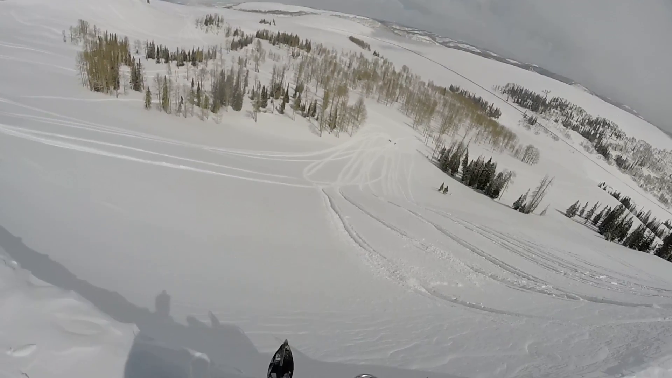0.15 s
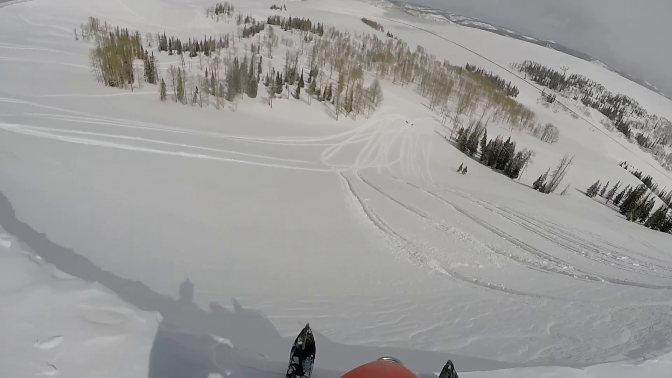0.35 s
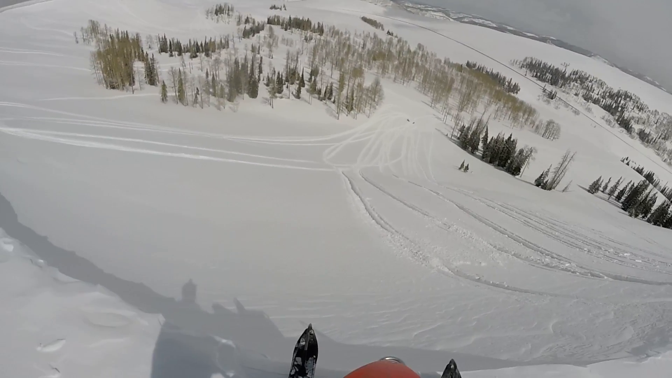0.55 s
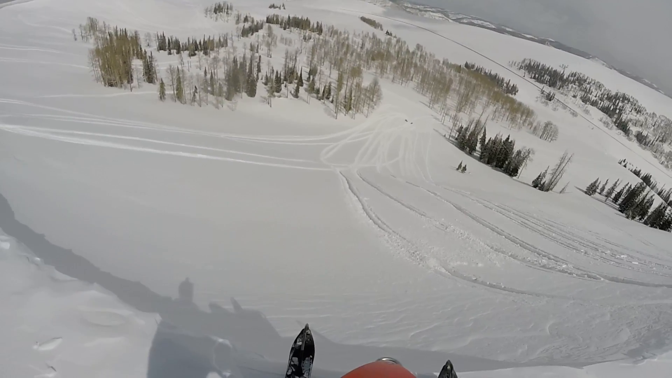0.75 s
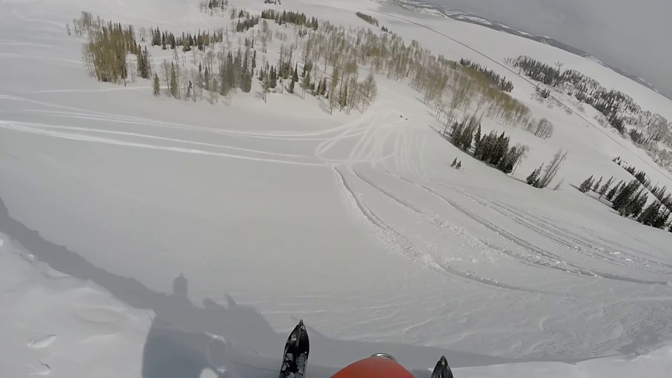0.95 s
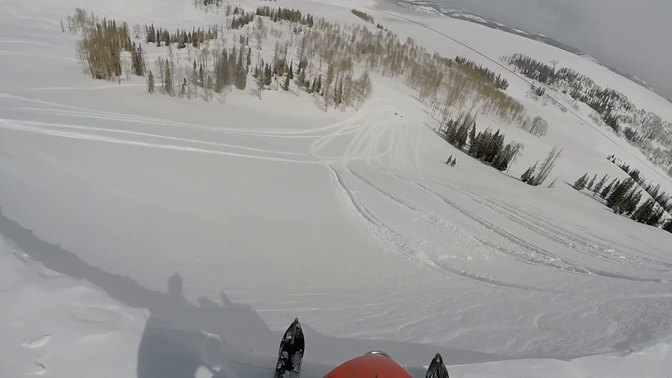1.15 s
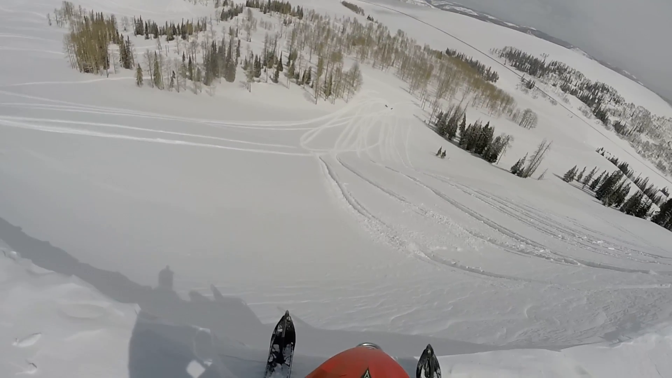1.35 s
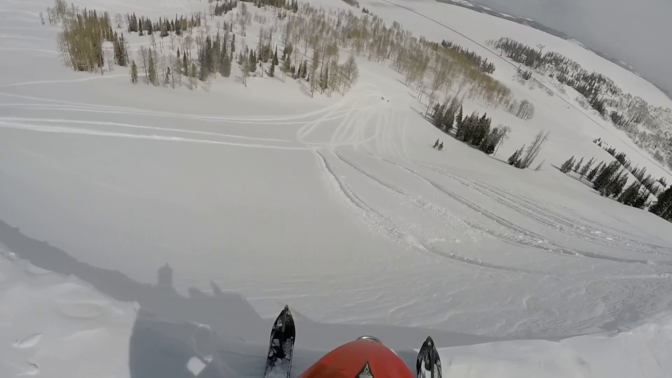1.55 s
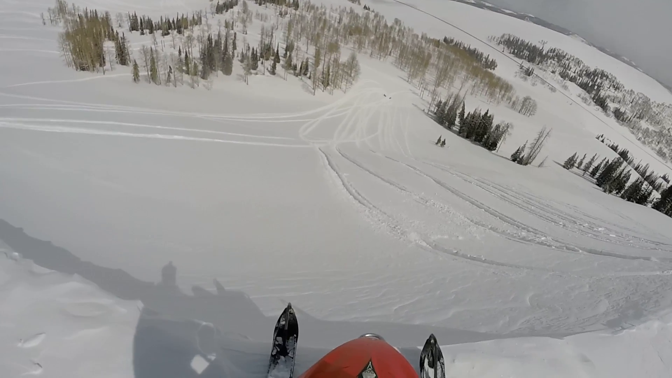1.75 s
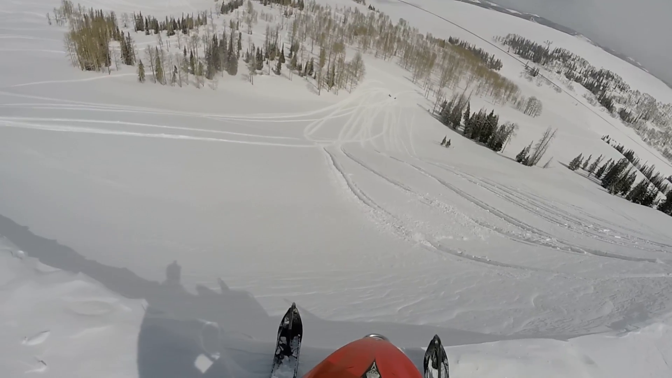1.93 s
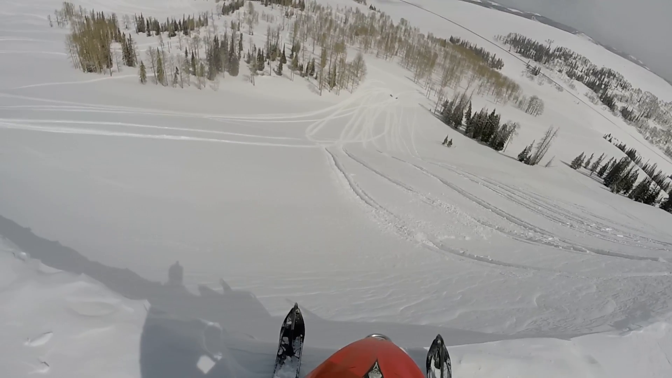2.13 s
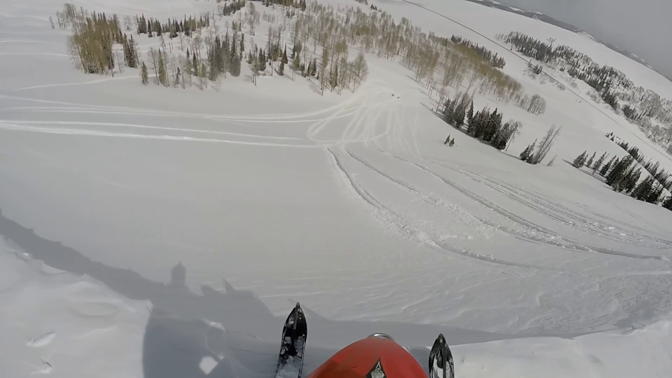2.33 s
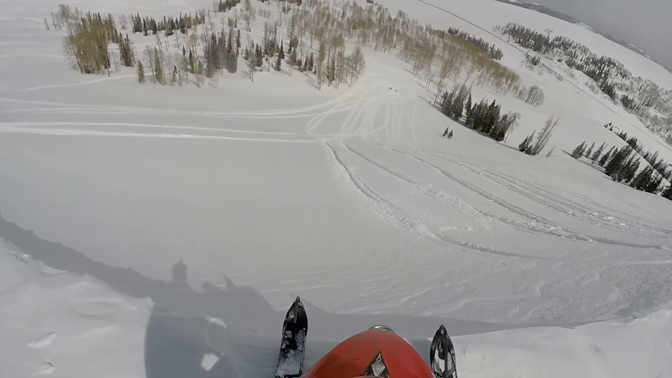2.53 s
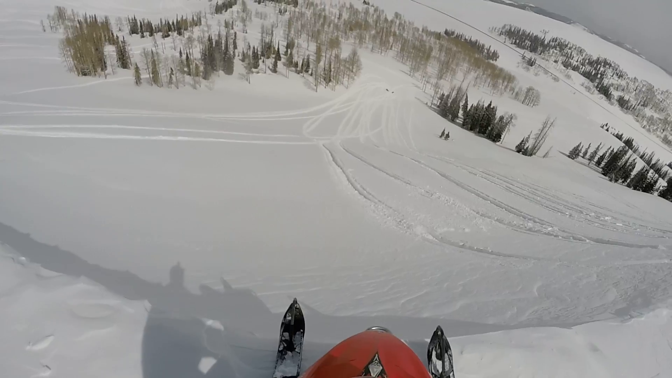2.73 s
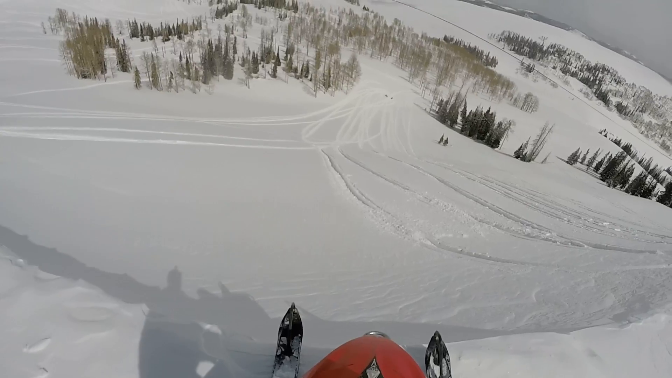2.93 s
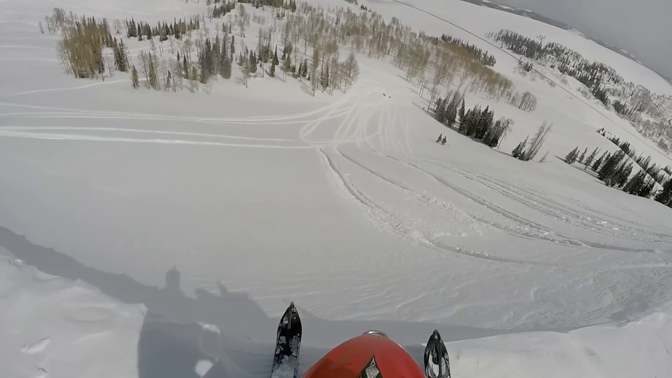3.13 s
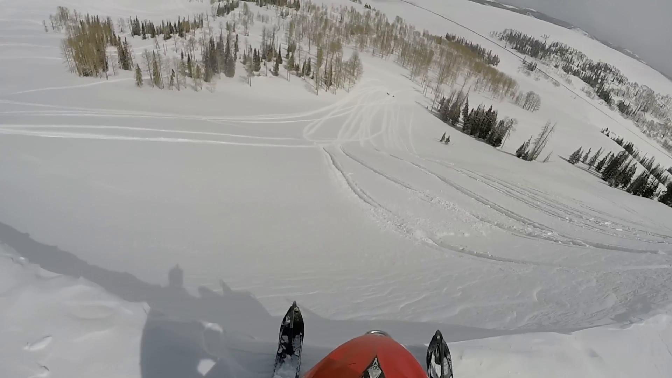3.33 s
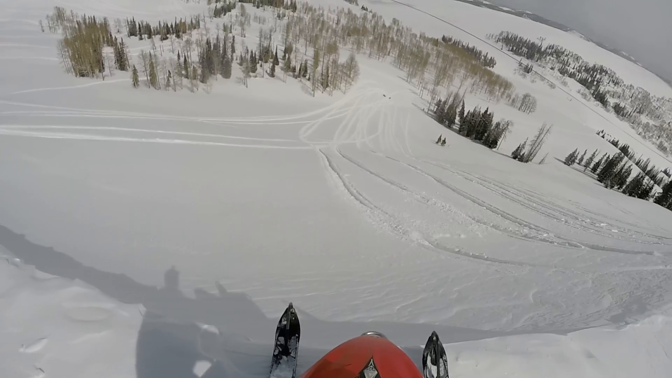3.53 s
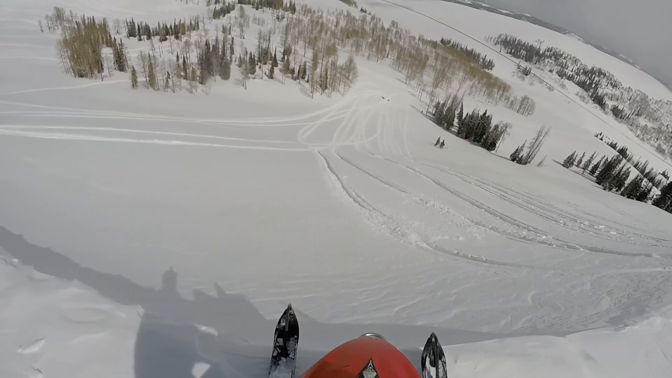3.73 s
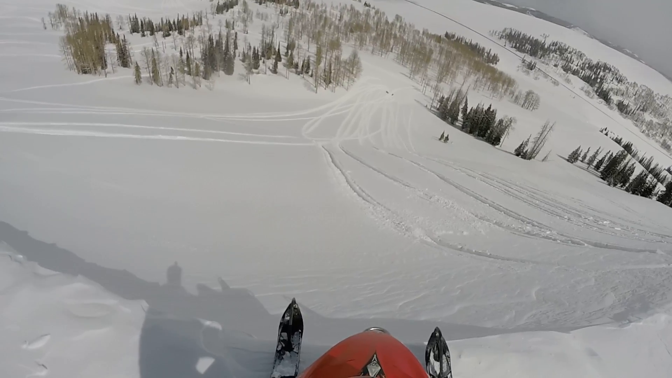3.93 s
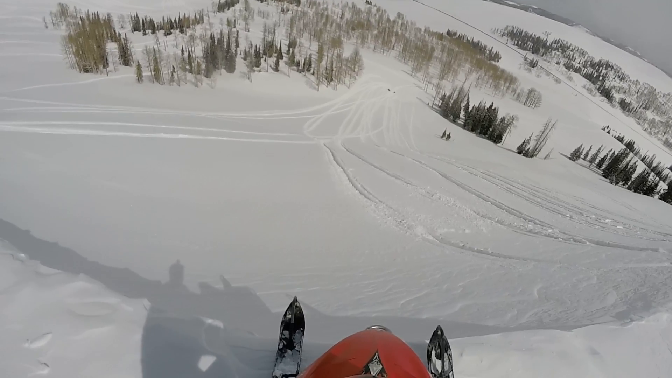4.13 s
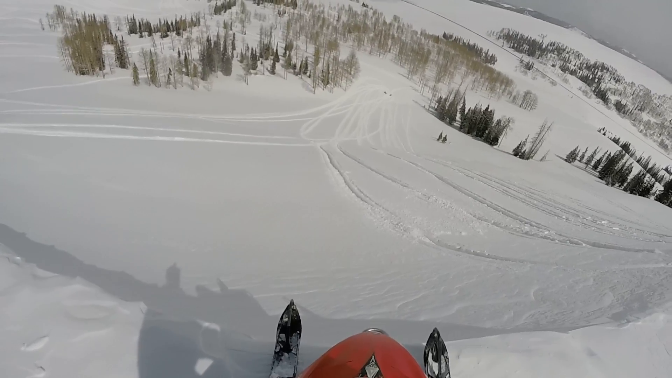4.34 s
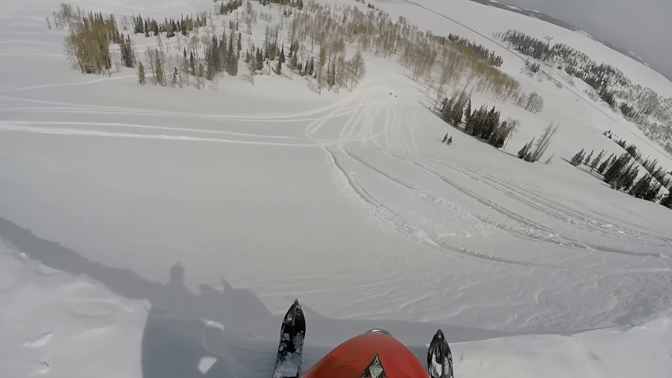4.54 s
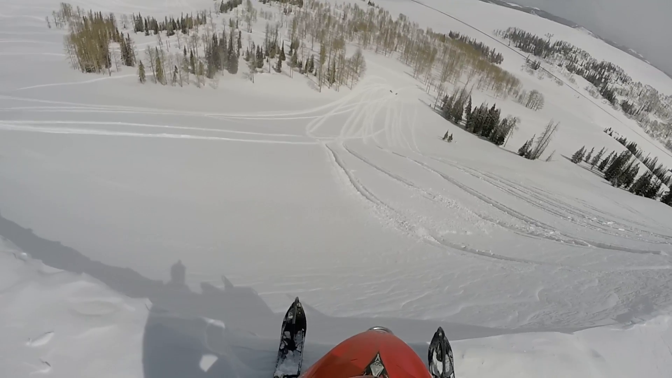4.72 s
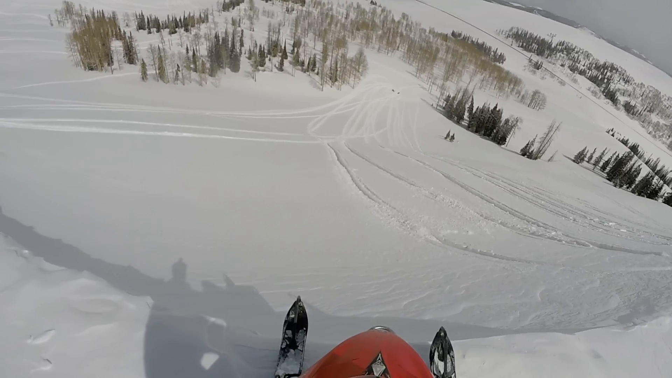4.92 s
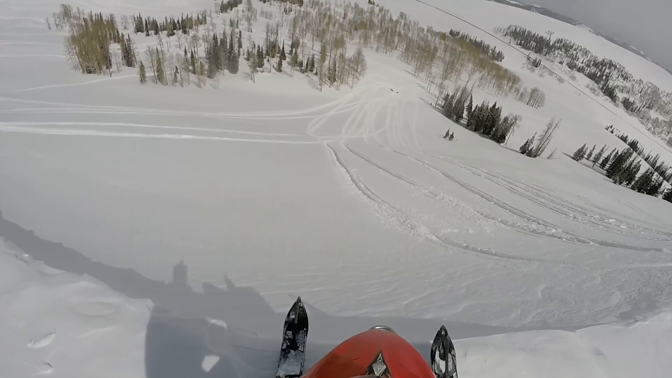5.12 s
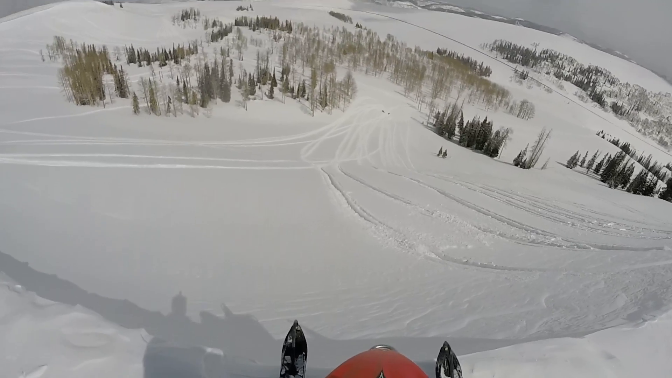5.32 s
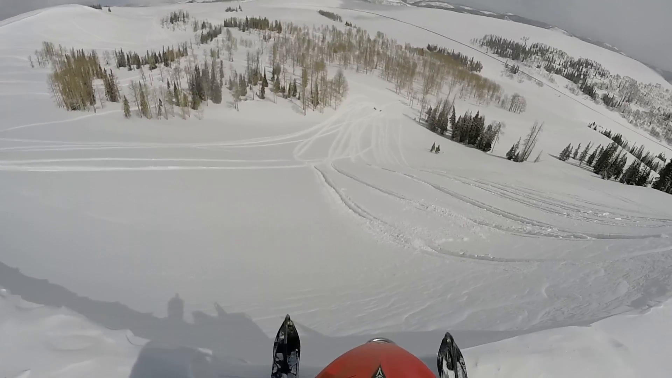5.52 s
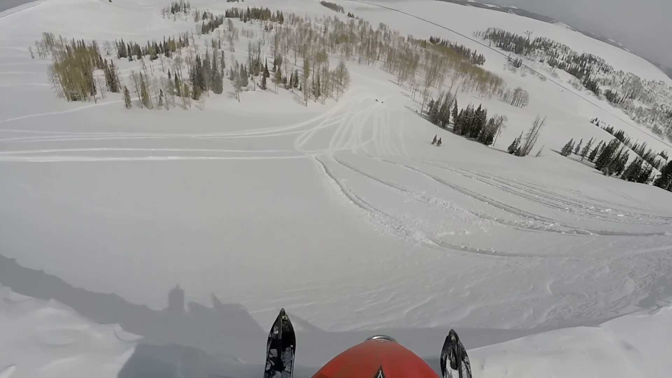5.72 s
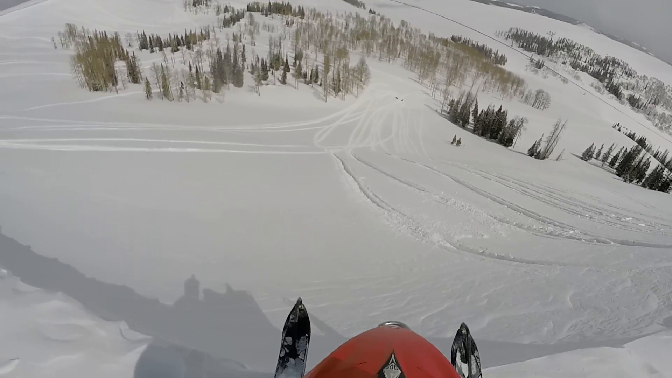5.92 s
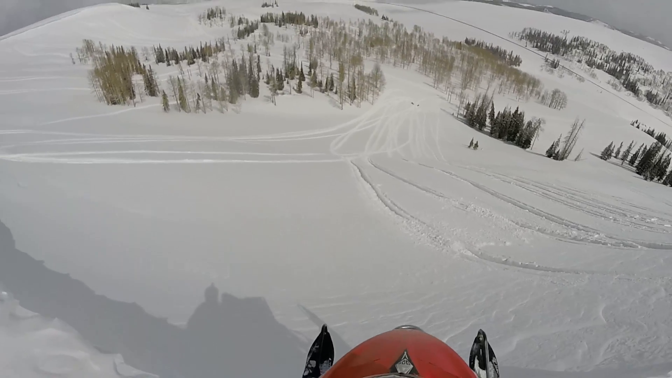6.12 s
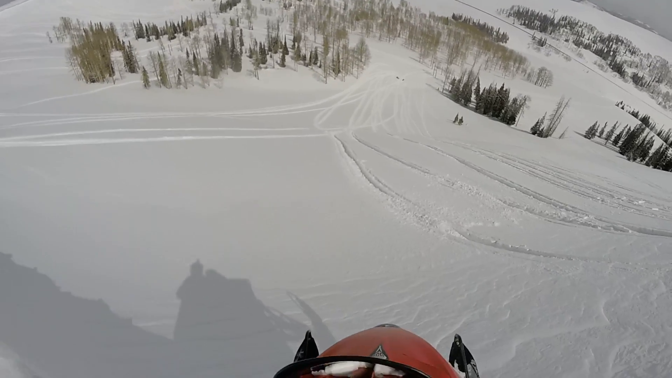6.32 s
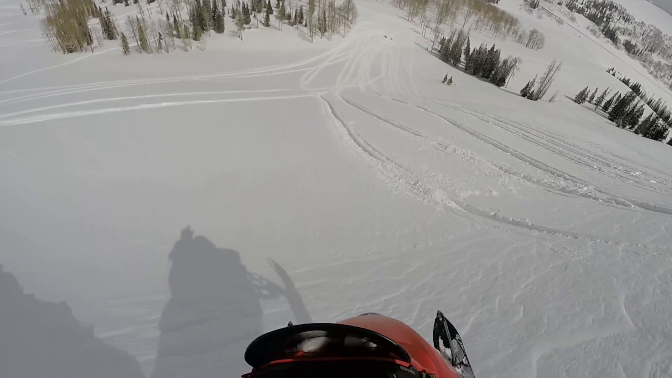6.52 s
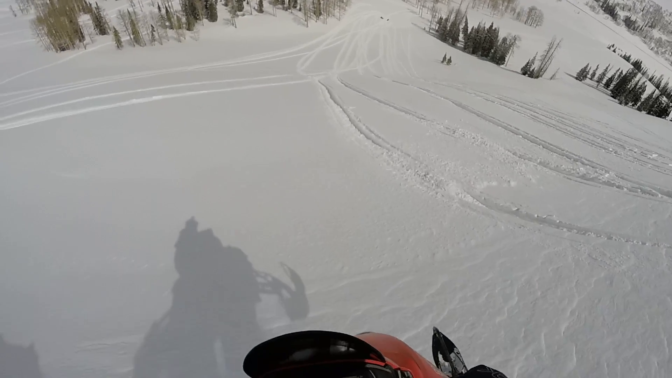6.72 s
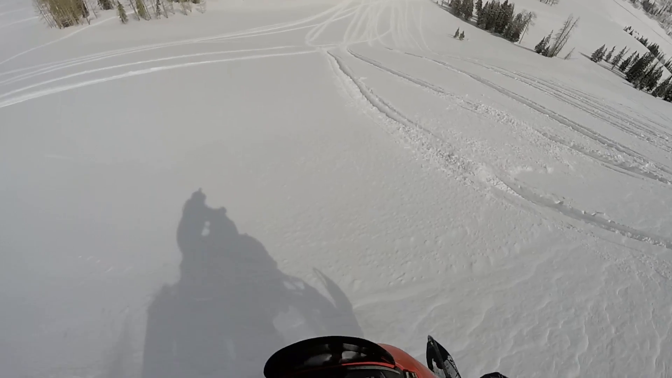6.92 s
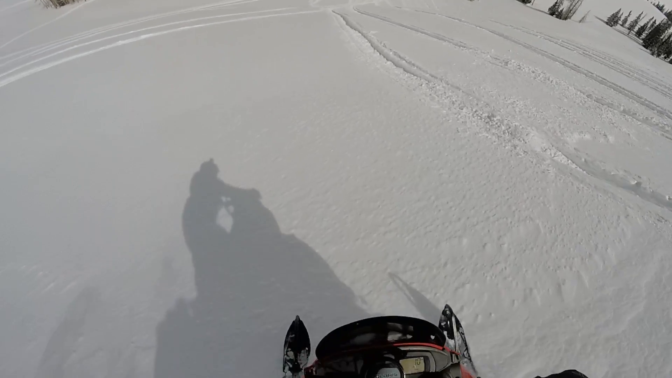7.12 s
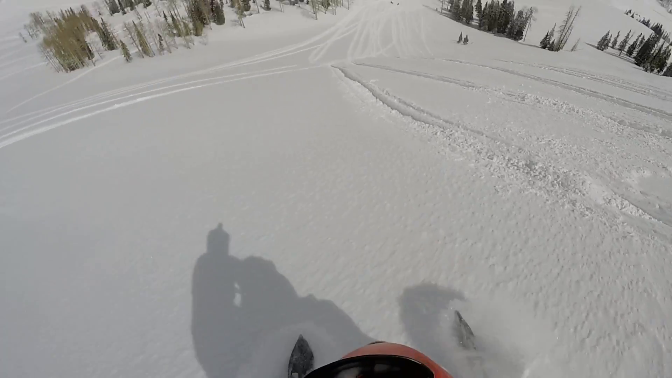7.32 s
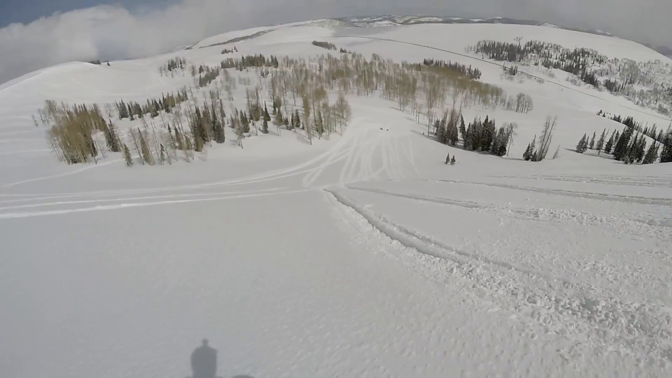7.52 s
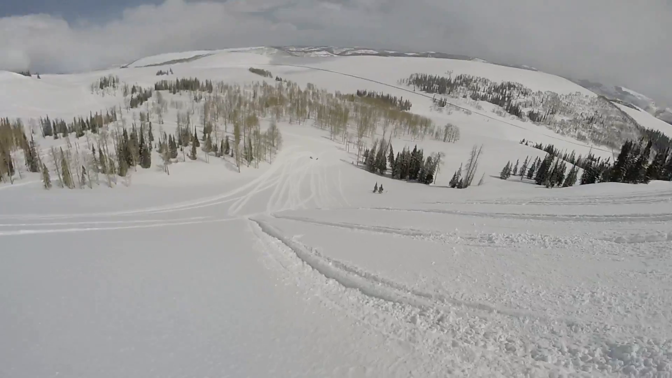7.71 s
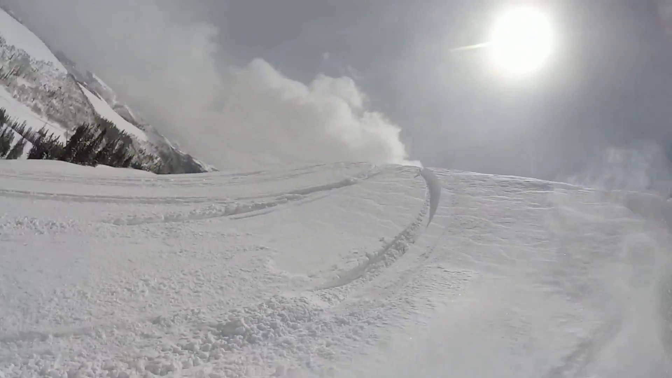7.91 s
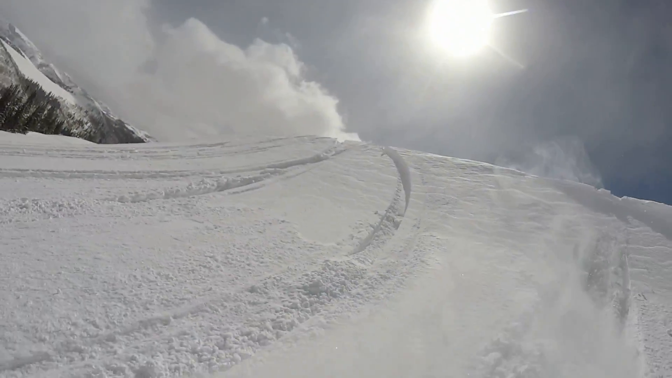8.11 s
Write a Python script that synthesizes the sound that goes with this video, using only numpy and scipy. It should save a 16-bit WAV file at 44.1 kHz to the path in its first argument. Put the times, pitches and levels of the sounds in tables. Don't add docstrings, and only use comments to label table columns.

```python
import sys
import numpy as np
from scipy import signal
from scipy.fft import rfft, irfft, next_fast_len
from scipy.io import wavfile
from scipy.ndimage import uniform_filter1d, map_coordinates

SR = 44100
rng = np.random.default_rng(int(sys.argv[2]) if len(sys.argv) > 2 else 0)


def voltage_ratio(level):
    return 10 ** (np.asarray(level, float) / 20)


def int16_out(signal):
    q = np.round(np.clip(np.atleast_2d(signal).T, -1, 1) * 32767)
    wavfile.write(sys.argv[1], SR, q.astype(np.int16))


N = 364266
STEP = 32


def unit(x):
    return x / np.sqrt(np.mean(x ** 2) + 1e-20)


def curves(rows):
    s, *cols = np.transpose(rows)
    return [np.interp(np.arange(N) / SR, s, c) for c in cols]


def full(control):
    return np.interp(np.arange(N), np.arange(0, N, STEP), control)


def drift(rate_hz):
    knots = rng.standard_normal(int(N * rate_hz / SR) + 4)
    return map_coordinates(knots, [np.arange(0, N, STEP) * rate_hz / SR])


def wobble(rate_hz):
    return full(drift(rate_hz))


def fade(start_s, stop_s):
    return np.clip((np.arange(N) / SR - start_s) / (stop_s - start_s), 0, 1)


def swells(s, db, hold_s, rise, fall):
    t = np.arange(0, N, STEP) / SR - np.reshape(s, (-1, 1))
    db, hold_s, rise, fall = (np.reshape(v, (-1, 1)) for v in (db, hold_s, rise, fall))
    level_db = db + rise * np.minimum(t, 0) - fall * np.maximum(t - hold_s, 0)
    return full(10 * np.log10(np.sum(voltage_ratio(2 * level_db), 0) + 1e-12))


def place(out, s, t, x):
    first = round((s + t[0]) * SR)
    out[first:first + len(t)] += x


def filtered(x, response):
    m = next_fast_len(len(x) + len(x) // 16)
    return irfft(rfft(x, m) * response(np.fft.rfftfreq(m, 1 / SR)), m)[:len(x)]


def along(points, hz):
    f, db = np.transpose(points)
    return np.interp(np.log(hz), np.log(f), db)


def colour(points):
    hz, db = np.transpose(points)
    return lambda f: voltage_ratio(np.interp(np.log(f + 1), np.log(hz + 1), db, left=-120, right=-120))


def peaks(modes):
    def response(f):
        return sum((-1) ** k * voltage_ratio(db) * 1j * f * w / (c * c - f * f + 1j * f * w + 1e-9)
                   for k, (c, w, db) in enumerate(modes))
    return response


def lift(modes, f):
    return sum(db / (1 + (2 * (f - c) / w) ** 2) for c, w, db in modes)


# centre in Hz, width in Hz, lift in dB.
CAVITY_MODES = [(684, 21, 4), (1235, 120, 6.5), (1620, 420, 7.5), (2358, 81, 7.5), (2950, 330, 4.5),
                (4647, 80, 6), (5400, 130, -3.5), (6060, 200, 4.5), (7600, 500, 4), (9000, 250, 3),
                (10200, 350, 3.5), (11800, 600, 4.5)]


def housing(f):
    return voltage_ratio(lift(CAVITY_MODES, f))


# mixture catches in s, firing rate there in Hz, mixture quits in s, rate there in Hz.
IDLE_SURGES = [(-.4, 45, -.15, 80), (.335, 42, .565, 84), (1.03, 44.5, 1.28, 71), (1.65, 44, 1.86, 58),
               (1.93, 52, 1.99, 56), (2.145, 42.5, 2.35, 85.5), (2.85, 49, 3.04, 79), (3.42, 50, 3.6, 89.5),
               (4.2, 48, 4.395, 71.5), (4.665, 48, 4.81, 76)]
# time in s, firing rate in Hz, load in dB, roar in dB.
THROTTLE_PULLS = [
    [(5.31, 38.05, 2.5, -51), (5.39, 50.92, -4, -49), (5.49, 79.9, 2, -47), (5.7, 139.7, 0, -38),
     (5.79, 156.3, 0.5, -35), (5.93, 170, 1.5, -36), (6.02, 152.8, -1.5, -37)],
    [(6.16, 138.9, -6, -38), (6.27, 149.9, 0.5, -34.5), (6.4, 165.9, -1.5, -34), (6.48, 166.9, -3, -33.5),
     (6.72, 160.4, -13, -34), (6.8, 147.6, -23, -38.5)],
]


def speed():
    pulls = np.concatenate(THROTTLE_PULLS)
    first_s, first_hz = pulls[0, :2]
    idle = [(s, hz, 0, -120) for s, hz in np.reshape(IDLE_SURGES, (-1, 2))]
    rate, load_db, roar_db = curves([*idle, (first_s - .03, first_hz, 0, -75), *pulls])
    burning = (np.gradient(rate) > 0) | (np.arange(N) > first_s * SR)
    rate = uniform_filter1d(rate, round(.035 * SR))
    burning = uniform_filter1d(1. * burning, round(.045 * SR))
    return rate, burning, load_db, roar_db


# from s, to s.
SPARK_CUT_S = (5.955, 6.128)


def ignition():
    off_s, on_s = SPARK_CUT_S
    return 1 - 0.86 * (fade(off_s, off_s + 0.01) - fade(on_s, on_s + 0.0156))


# start in s, level in dB, hold in s, fade in dB per s.
FIRING_BURSTS = [(0, -59, .01, 97.5), (0.305, -56, 0.0133, 600), (0.37, -52.5, .02, 60),
                 (0.43, -50.5, 0.05, 30), (0.833, -59.5, .005, 600), (1.023, -53, .03, 95.5),
                 (1.13, -49, .01, 47), (1.617, -50, .005, 250), (1.685, -51.5, .01, 80),
                 (1.774, -48, 0.0286, 250), (1.95, -58.5, .01, 50), (2.148, -49, 0.15, 21),
                 (2.85, -55, .02, 60), (2.916, -49.5, .05, 48), (3.416, -49, 0.21, 35),
                 (4.176, -52, 0.017, 197), (4.269, -49, 0.0098, 59.5), (4.677, -48.5, .01, 250),
                 (4.721, -53, 0.1, 38.5)]


def mechanical_level(roar_db):
    start_s, db, hold_s, fall = np.transpose(FIRING_BURSTS)
    burst_db = swells(start_s, db, hold_s, 530, fall)
    return 10 * np.log10(voltage_ratio(burst_db) ** 2 + voltage_ratio(roar_db) ** 2 + voltage_ratio(-55.8) ** 2)


# frequency of the order in Hz, level in dB.
CRANK_ORDER = [(20, -47), (33, -43.5), (43, -42), (55, -61.5), (85, -51.5)]
BURNING_ORDER = [(45, -45), (65, -41), (81, -36.5), (110, -33.5), (140, -27.5), (153, -23), (169, -34)]
COASTING_ORDER = [(45, -50), (56, -52), (71, -41), (85, -43), (170, -30)]
TWICE_ORDER = [(80, -43), (101, -35.5), (140, -44.5), (165, -50.5), (220, -45.5), (285, -31.5), (312, -35),
               (336, -31)]
# multiple of firing rate, level in dB, dB per dB of load.
UPPER_ORDERS = [(1.5, -12, 0), (3, -2.5, .8), (4, -4.5, -.2), (5, -4.5, .4), (6, -6.5, .4), (7, -3, 0),
                (8, -7, 0), (9, -11, -.2), (10, -12, 0), (11, -9, 0), (14, -9, 0), (15, -11, 0),
                (16, -10, 0), (17, -11, 0)]
# centre in Hz, width in Hz, lift in dB.
SILENCER_MODES = [(142.5, 26, 15), (247, 82, 7), (462, 49, 5.5), (689.7, 83, 7.5), (1138, 130, 9),
                  (1710, 180, 7.5), (2380, 200, 6), (2950, 300, 4)]


def exhaust_note(rate, burning, load_db, noise_db, throttle, turn):
    def tone(k, db, flutter_db):
        level = full(voltage_ratio(db + flutter_db * drift(16)))
        return -np.sqrt(2) * level * np.cos(2 * np.pi * k * (turn + .25) + .04 * k * k)

    crank_db = along(CRANK_ORDER, rate / 2)
    twice_db = along(TWICE_ORDER, 2 * rate) + 0.603 * load_db - 4 * burning * (rate < 90)
    fire = burning * voltage_ratio(along(BURNING_ORDER, rate) + load_db)
    fire -= (1 - burning) * voltage_ratio(along(COASTING_ORDER, rate))
    fire_db = 20 * np.log10(np.abs(fire) + 1e-6)
    note = tone(.5, crank_db[::STEP], 1.5) + fire * tone(1, 0, 1.46) + tone(2, twice_db[::STEP], 1.53)

    main_db = uniform_filter1d(np.maximum(fire_db, twice_db), 1500)
    upper_db = (1 - throttle) * (noise_db - 9) + throttle * (0.42 * main_db - 34.5)
    slow_rate = rate[::STEP]
    shut = 1 - throttle[::STEP]
    port_closed = np.clip((132 - slow_rate) / 12, 0, 1) * throttle[::STEP]
    for k, db, follows in UPPER_ORDERS:
        level_db = upper_db[::STEP] + db + follows * load_db[::STEP]
        level_db = level_db - 3.2 * abs(k - 3) * shut - .8 * k * port_closed
        level_db = level_db + lift(SILENCER_MODES, k * slow_rate)
        note = note + tone(round(2 * k) / 2, level_db, 2.3)
    return note


# centre in Hz, width in Hz, level in dB.
PIPE_MODES = [(109, 19.16, 3.5), (146.36, 29, -5.5), (246.2, 43.4, -11.5), (342, 34, -10.5), (688, 69, -25)]


def pipe_pops(turn, climb, throttle):
    strokes = np.flatnonzero(np.diff(np.floor(turn)))
    strength = rng.uniform(0.13, 1, N) * climb * (1 - 0.38 * throttle)
    pops = np.zeros(N)
    pops[strokes] = strength[strokes]
    return voltage_ratio(-47) * unit(filtered(pops, lambda f: peaks(PIPE_MODES)(f) / (1 + 1j * f / 500)))


def chassis_shake():
    rumble = colour([(4, -13), (15, -12.0), (100, 0.5), (160, -10.5), (400, -24.5)])
    return voltage_ratio(-49.5) * unit(filtered(rng.standard_normal(N), rumble))


def ringing(grit, modes, top_hz=4000):
    return unit(filtered(grit, lambda f: peaks(modes)(f) / (1 + (f / top_hz) ** 4)))


# frequency in Hz, dB per Hz.
IDLE_CLATTER = [(88, -17), (150, 0), (182, -10.5), (321, -7.5), (589, -20.5), (675, -19.5), (960, -21),
                (1260, -21), (1980, -24), (2920, -21), (4410, -33), (8500, -43), (14200, -54.5),
                (16000, -81)]
FULL_ROAR = [(100, -12), (200, 2), (400, 0.5), (550, -9), (1140, -4), (1700, -4), (2000, -6), (2900, .5),
             (3900, -14.5), (11700, -37), (14300, -54), (15300, -80)]
# centre in Hz, width in Hz, level in dB.
PING_MODES = [(1580, 200, 0)]


def clatter(grit, rate, burning, noise_db, throttle, spark):
    idle = unit(filtered(grit, lambda f: colour(IDLE_CLATTER)(f) * housing(f)))
    roar = unit(filtered(grit, lambda f: colour(FULL_ROAR)(f) * housing(f)))
    roar = roar - .45 * (1 - spark) * filtered(roar, lambda f: 1 / (1 + (f / 1050) ** 8))
    slow_only = np.clip((82 - rate) / 15, 0, 1) * (1 - fade(5.2, 5.3))
    ping = voltage_ratio(-12 + 3.0 * wobble(25)) * burning * slow_only * ringing(grit, PING_MODES)
    fast_only = np.clip((rate - 66) / 14, 0, 1)
    buzz = voltage_ratio(-7 + 1.5 * wobble(9)) * fast_only * ringing(grit, [(672, 20, -14), (2325, 14, 0)])
    return voltage_ratio(noise_db) * (voltage_ratio(3.5) * (1 - throttle) * (idle + ping + buzz) + voltage_ratio(.2) * throttle * roar)


# centre in Hz, width in Hz, dB added at idle only, dB added once at idle and
COVER_MODES = [(672, 17, -19, -11.5), (1280, 47, -14.5, -24), (1710, 19, -18, -8.5), (2330, 25, -18, -16.5),
               (2560, 79, -26, -11)]


def covers(grit, noise_db, throttle):
    shut = 1 - throttle[::STEP]
    out = np.zeros(N)
    for hz, width_hz, idle_db, full_db in COVER_MODES:
        level_db = noise_db[::STEP] + shut * idle_db + (2.0 - shut) * full_db + 3 * drift(3.88)
        out += full(voltage_ratio(level_db)) * ringing(grit, [(hz, width_hz, 0)], 8000)
    return out


def engine():
    rate, burning, load_db, roar_db = speed()
    noise_db = mechanical_level(roar_db)
    spark = ignition()
    turn = np.cumsum(rate * (1 + .004 * wobble(25))) / SR
    climb = np.clip(0.271 * uniform_filter1d(np.gradient(np.log(rate)) * SR, 2000), .25, 1)
    throttle = np.clip((rate - 88) / 30, 0, 1)
    stroke_gate = 1 + (0.066 + 0.222 * climb) * np.cos(2 * np.pi * turn + 1.5)
    grit = stroke_gate * voltage_ratio(1.03 * wobble(30) + 1.056 * wobble(400)) * rng.standard_normal(N)
    out = spark * exhaust_note(rate, burning, load_db, noise_db, throttle, turn)
    out = out + pipe_pops(turn, climb, throttle) + chassis_shake()
    out = out + clatter(grit, rate, burning, noise_db, throttle, spark) + covers(grit, noise_db, throttle)
    return out * (1 - fade(6.77, 6.86))


# time in s, peak in dB, centre in Hz.
LIGHT_TICKS = [(0.2998, -37.5, 2300), (.3076, -37, 2950), (1.0096, -36, 1620), (1.6173, -36, 2560),
               (4.6703, -38, 1747), (7.064, -38.5, 3500), (7.3502, -39, 2500), (7.377, -36, 1250),
               (7.3185, -38, 1300)]
# time in s, peak in dB, centre in Hz, brightness in dB.
HARD_KNOCKS = [(5.6787, -14, 1870, -26), (6.0497, -17, 2740, -24), (6.0658, -19, 2300, -19),
               (6.4595, -17.5, 1510, -31), (6.7853, -0.5, 2800, -9.5), (6.809, -1, 3560, -8.5),
               (6.8207, -6, 2650, -23), (6.8289, -1.5, 2870, -16), (6.8568, -6.5, 2810, -18.5),
               (6.8656, -12.5, 2670, -20), (6.9088, -15.5, 2650, -28), (6.9229, -21, 2570, -32),
               (7.0202, -2, 2000, -20.5), (7.0727, -13, 3000, -5.5), (7.0767, -5.5, 2500, -3),
               (7.0824, -11, 2740, -10), (7.0914, -15, 3210, -11.5), (7.097, -14.5, 2890, -10),
               (7.4345, -3.5, 2730, -15), (7.444, -11.5, 2380, -20), (7.6018, 2, 3080, -12.5),
               (7.61, -13.5, 2400, -13), (7.659, -23.5, 2230, -30), (7.7379, -7, 1795, -26.5),
               (7.7619, -12, 1930, -32), (8.0032, -27.5, 2500, -32), (8.1496, -19, 1648, -36),
               (8.1606, -1, 2770, -18.5), (8.1682, -11, 2850, -19)]
# first contact in s, number of contacts, peak in dB.
CHATTER_RUNS = [(6.0264, 5, -24), (6.0536, 1, -21), (6.0699, 1, -18), (6.4651, 3, -25), (6.7697, 3, -25),
                (6.793, 1, -23), (6.8415, 3, -22), (6.8709, 1, -20), (6.8165, 1, -26), (6.9125, 2, -28),
                (6.977, 2, -29), (7.0268, 1, -32), (7.0875, 1, -15), (7.0805, 1, -10), (7.1035, 1, -20),
                (7.114, 1, -32), (7.4482, 1, -22), (7.581, 1, -24), (7.6128, 2, -27), (7.663, 1, -26.5),
                (7.7505, 1, -28), (7.7205, 1, -33), (7.769, 1, -26), (7.848, 3, -39), (8.1348, 3, -33),
                (8.1533, 1, -19)]


def contacts():
    gap_s, chatter_hz, bright_db = .0052, 2300, -29.5
    ticks = [(*tick, bright_db - 2.5) for tick in LIGHT_TICKS]
    runs = []
    chance = rng.standard_normal((len(CHATTER_RUNS), 6, 4))
    for (s, count, db), row in zip(CHATTER_RUNS, chance):
        for k, (late, size, pitch, edge) in enumerate(row[:round(count)]):
            when_s = s + gap_s * (k + .15 * late * (k > 0))
            runs.append((when_s, db + 2 * size, chatter_hz * (1 + .12 * pitch), bright_db + 4 * edge))
    return [*HARD_KNOCKS, *ticks, *runs]


# frequency in Hz, level in dB, t60 in s.
SHELL_MODES = [(1620, -17, .02), (1855, -19, .03), (2140, -20, .04), (2315, -22, .045), (2970, -26, .05),
               (3300, -17, .018), (4135, -27, .06), (5300, -21, .055), (6450, -19, .028),
               (10500, -25, .025), (12600, -28, .016)]
# frequency in Hz, level in dB.
RATTLE_COLOUR = [(200, -10), (800, -6), (1400, 0), (3400, -2), (5000, -11), (9000, -31.5), (16000, -52)]


def mount():
    out, t = np.zeros(N + SR), np.arange(-SR // 200, SR // 14) / SR
    bright = colour([(3500, -20.5), (5500, 5), (9000, -6.0), (13500, -21), (15800, -49.5)])
    thump = (t >= 0) * voltage_ratio(-26.5 - 60 * abs(t) / 0.012) * np.sin(2 * np.pi * 380 * t)

    def top(x):
        return x / np.max(np.abs(x))

    def burst(t60_s):
        return (t >= 0) * voltage_ratio(-60 * abs(t) / t60_s) * rng.standard_normal(len(t))

    for s, db, hz, bright_db in contacts():
        soft = np.clip(-db / 30, 0, 1)
        blow = 3 * (1 - soft) * (t == 0) + 1.22 * (1 - soft) * burst(0.0036)
        blow = blow + .6 * burst(0.013) + voltage_ratio(-21.5 + 9.2 * soft) * burst(0.037)
        body = peaks([(hz, (.9 - .45 * soft) * hz, 0)])
        crack = top(filtered(blow, lambda f: body(f) * colour(RATTLE_COLOUR)(f)))
        edge = voltage_ratio(bright_db + 0.5) * top(filtered(burst(0.008 + 0.007 * soft), bright))
        ring = np.zeros(len(t))
        for f, level_db, t60_s in SHELL_MODES:
            wake_db = bright_db if f > 5000 else .3 * bright_db - 4
            decay = voltage_ratio(level_db + wake_db + rng.normal(0, 4) - 60 * abs(t) / t60_s)
            onset = np.clip(t / .0006, 0, 1)
            ring += decay * onset * np.sin(2 * np.pi * f * rng.normal(1, 0.004) * t)
        place(out, s, t, voltage_ratio(db - .5) * (crack + edge + ring + thump))
    return out[:N]


# time in s, buffet in dB, boom in dB, seconds to swell by 20 dB.
HELMET_JOLTS = [(6.03, -38, -33, .11), (6.19, -37, -36.5, 0.33), (6.47, -42, -34, 0.06),
                (6.6, -35, -37, 0.11), (6.77, -42, -34, 0.01), (6.95, -43, -46, 0.19),
                (7.09, -40.5, -49, 0.41), (7.38, -43, -43.5, 0.23), (7.56, -39, -46, 0.23),
                (7.95, -50, -33.5, .1), (8.035, -49.5, -34, 0.1069), (8.11, -47, -36, .08)]


def jolts():
    s, jolt_db, ring_db, swell_s = np.transpose(HELMET_JOLTS)
    rise = 20 / swell_s
    fall = rise / .8
    buffet_db = np.maximum(swells(s, jolt_db, 0, rise, fall), -51.5)
    boom_db = np.maximum(swells(s, ring_db, 0, rise, fall), -53.5)
    rumble = colour([(3, -12), (10, 2), (30, -6.0), (70, -14.5), (200, -30)])
    buffet = voltage_ratio(buffet_db + 1.0) * unit(filtered(rng.standard_normal(N), rumble))
    main, upper = peaks([(104, 30, 0)]), peaks([(240, 50, -24), (350, 60, -24)])
    ring = unit(filtered(rng.standard_normal(N), lambda f: main(f) ** 2 + upper(f)))
    return buffet * fade(5.06, 5.5) + voltage_ratio(boom_db + 4.0) * ring * fade(5.95, 6.05)


# time in s, level in dB.
AIR_SPEED = [(6.94, -52.5), (7.32, -51.5), (7.5, -45), (7.74, -38.5), (7.82, -39.5), (7.925, -40),
             (7.95, -55), (8.02, -61.5), (8.14, -65), (8.26, -81)]
# frequency in Hz, dB per Hz.
SPRAY_COLOUR = [(88, -29), (150, -2), (212, -9.5), (350, -3.5), (468, -16), (636, -15.5), (687, -20.5),
                (833, -12.5), (1180, -15.5), (1770, -14.5), (2920, -13), (13500, -60)]
# centre in Hz, width in Hz, level in dB.
EDGE_MODES = [(5350, 120, 0), (10000, 300, -9)]


def wind_and_spray():
    air_db, = curves(AIR_SPEED)
    grit = voltage_ratio(1.8 * wobble(30) + 2.7 * wobble(300)) * rng.standard_normal(N)
    hiss_db = -47.5 + .08 * (air_db + 51)
    hiss = voltage_ratio(hiss_db) * unit(filtered(grit, lambda f: colour(SPRAY_COLOUR)(f) * housing(f)))
    whistle_mode = peaks([(2900, 750, 0)])
    whistle = unit(filtered(grit, lambda f: whistle_mode(f) ** 2 / (1 + (f / 9000) ** 6)))
    whistle = voltage_ratio(air_db - 5.0) * whistle
    fizz_db = -71.5 + .3 * (air_db + 49.5)
    fine = colour([(3000, -12), (4500, 0), (7000, -6), (10000, -11), (13200, -26)])
    fizz = voltage_ratio(fizz_db) * unit(filtered(rng.standard_normal(N), lambda f: fine(f) * housing(f)))
    edges = unit(filtered(rng.standard_normal(N), lambda f: peaks(EDGE_MODES)(f) ** 2))
    edges = voltage_ratio(air_db - 28 + 3 * wobble(30)) * edges
    return (hiss + whistle + fizz) * fade(6.77, 6.86) + edges * fade(7.74, 7.8)


# middle in s, length in s, level in dB, centre in Hz, width in Hz.
SEAT_SCRAPES = [(6.04, .06, -38, 680, 120), (6.048, .06, -36, 1260, 200), (6.05, .03, -33, 2450, 300),
                (6.068, .03, -33, 2400, 400), (6.142, .02, -37, 2450, 300), (6.992, .025, -37, 3300, 1500),
                (6.995, .03, -38, 1750, 300), (7.104, .018, -30, 2800, 2500), (7.09, .05, -42, 10500, 200),
                (7.085, .05, -47, 12600, 400), (7.085, .03, -29, 4300, 1500), (6.915, .025, -46, 6450, 120),
                (6.815, .02, -44, 12600, 400), (7.215, .08, -58, 4500, 4000), (7.33, .1, -50, 1400, 700),
                (7.482, .03, -44, 1600, 1500), (7.532, .03, -45, 1400, 1500), (7.582, .03, -34, 2400, 1500),
                (7.585, .03, -52, 6000, 5000), (7.725, .04, -38, 2900, 1000), (7.728, .04, -55, 7000, 8000),
                (7.755, .018, -31, 2400, 1500), (7.93, .02, -45, 1300, 800), (7.966, .02, -46, 1300, 500),
                (7.979, .014, -44, 1300, 600), (8.006, .03, -42, 1570, 100), (8.0, .07, -66, 7000, 1500),
                (8.066, .02, -46, 1100, 700), (8.08, .02, -46, 1600, 700), (8.14, .025, -39, 1300, 1500),
                (8.14, .025, -57, 6000, 8000), (8.202, .02, -44, 1300, 900)]


def scrapes():
    out, t = np.zeros(N + SR), np.arange(-SR // 14, SR // 14) / SR
    for s, length_s, db, hz, width_hz in SEAT_SCRAPES:
        grain_db = 18 * uniform_filter1d(rng.standard_normal(len(t)), size=40)
        grains = voltage_ratio(grain_db) * rng.standard_normal(len(t))

        def seat(f):
            band = peaks([(hz, width_hz, 0)])(f) ** 2 * housing(f)
            return band / (1 + (f / (2 * hz)) ** 4) / (1 + (f / 12800) ** 20)

        rub = unit(filtered(grains, seat))
        place(out, s, t, voltage_ratio(db) * np.exp(-(3.0 * t / length_s) ** 2) * rub)
    return out[:N]


# time in s, peak in dB, swing in Hz.
HEAD_SHOVES = [(6.043, -28, 30), (6.773, -22, 70), (6.815, -28, 50.1), (6.93, -37, 30), (6.995, -32, 60),
               (7.073, -26.5, 34.64), (7.572, -29, 30), (8.136, -33, 60)]


def shoves():
    out, t = np.zeros(N + SR), np.arange(-SR // 10, SR // 10) / SR
    for s, db, hz in HEAD_SHOVES:
        bell = np.exp(-(2.3 * hz * t) ** 2)
        place(out, s, t, voltage_ratio(db) * bell * np.sin(-2 * np.pi * hz * t))
    return out[:N]


def scene():
    return (engine() + mount() + jolts() + wind_and_spray() + scrapes() + shoves())[None]


def low_pass(x):
    return signal.sosfilt(signal.butter(12, 16470, fs=SR, output="sos"), x)


def record(dry):
    clipped = np.clip(dry[0], -1, 1)
    limited = filtered(clipped, lambda f: np.clip((16500 - f) / 900, 0, 1) ** 2)
    return low_pass(limited[None])


dry = scene()
out = record(dry)
int16_out(out)
```